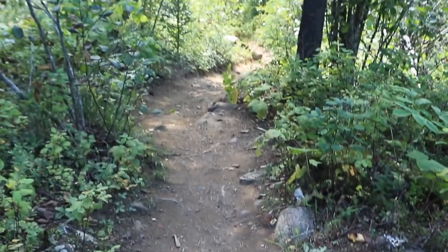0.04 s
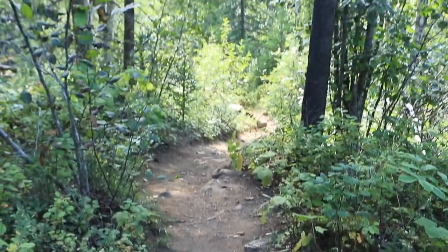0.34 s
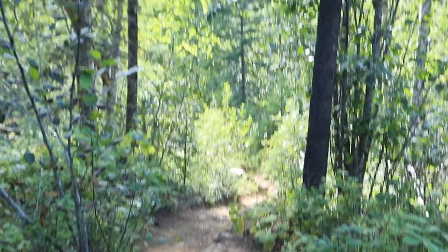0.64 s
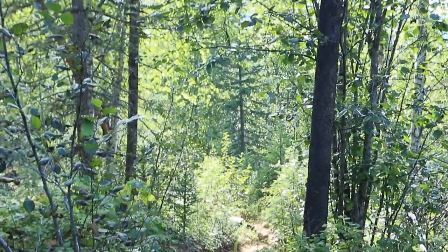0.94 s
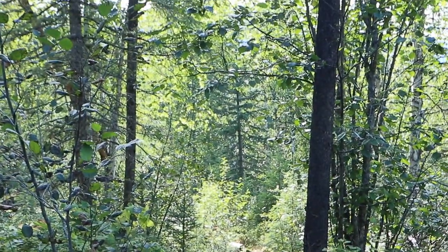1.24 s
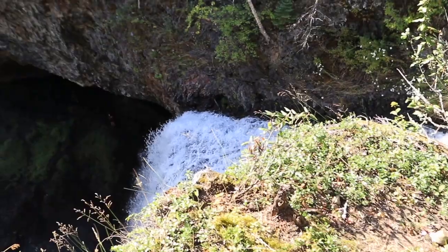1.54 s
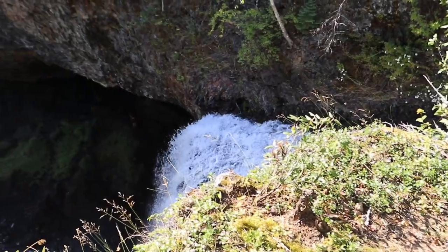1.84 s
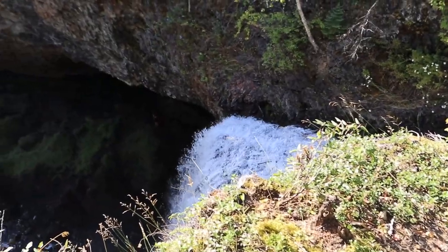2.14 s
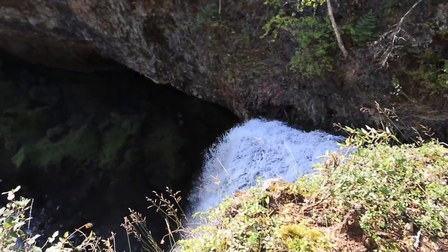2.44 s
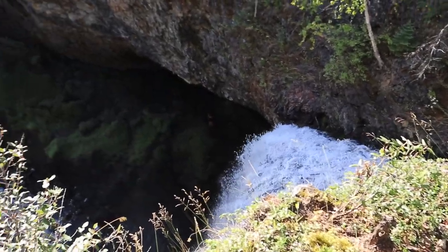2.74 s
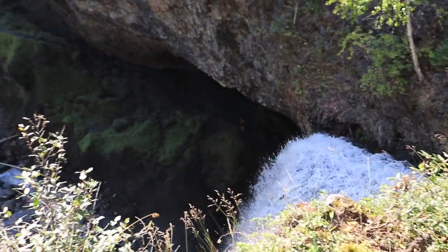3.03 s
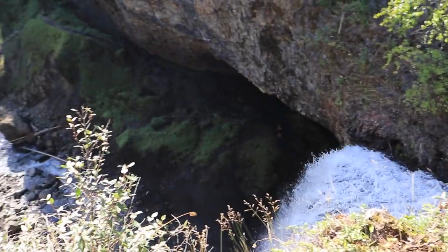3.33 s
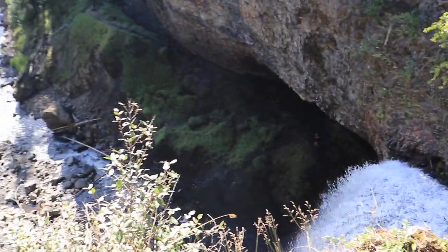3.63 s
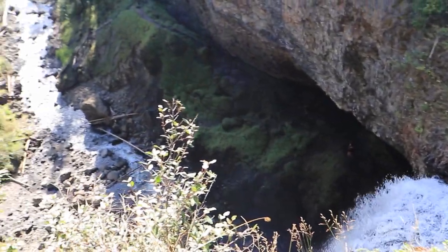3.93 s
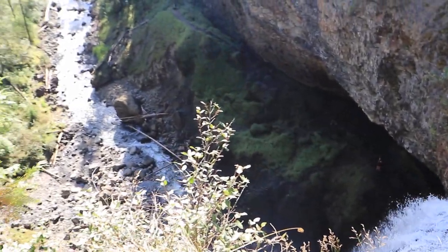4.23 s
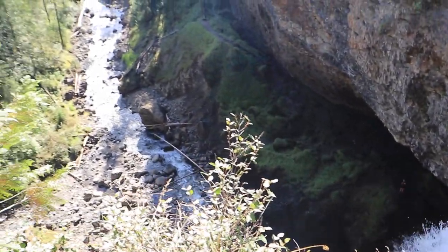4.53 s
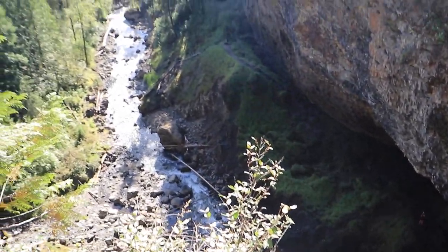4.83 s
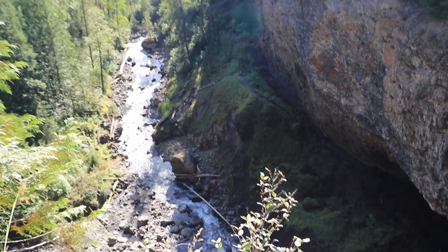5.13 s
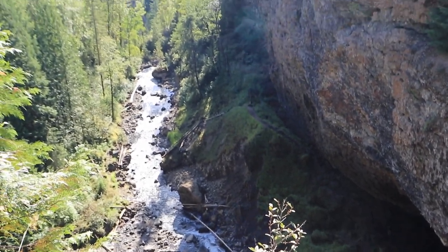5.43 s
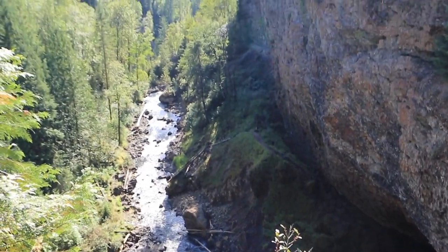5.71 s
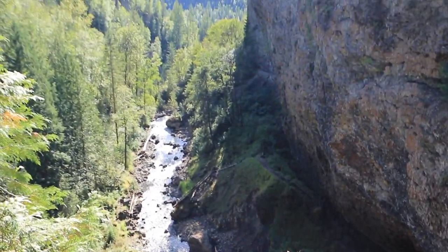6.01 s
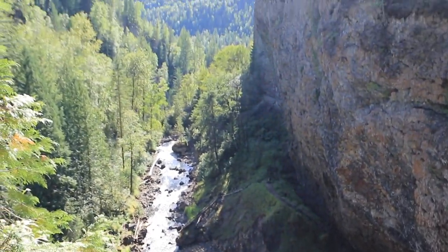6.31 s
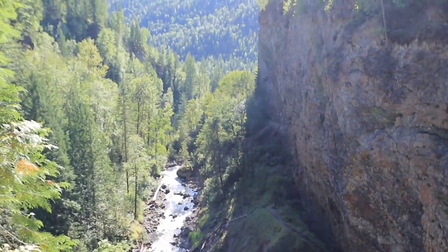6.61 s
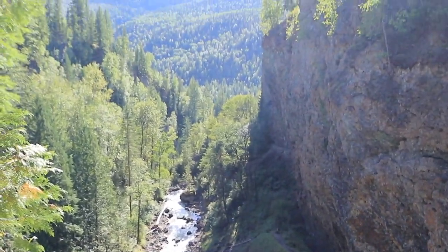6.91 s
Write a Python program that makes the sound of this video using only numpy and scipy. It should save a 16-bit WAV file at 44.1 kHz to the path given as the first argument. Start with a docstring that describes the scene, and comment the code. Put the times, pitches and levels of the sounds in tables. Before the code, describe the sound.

A waterfall roars dully through trees, then booms and hisses up close, with wind thumping the microphone before the rush swells back.

```python
"""Forest trail, then the brink of a big waterfall.
Countless drop impacts merge into a roar, dull through the trees. After a moment of silence, close up,
the plunge booms, spray hisses and gusts brush the microphone. Wind thumps it and two dull pops follow.
After the thump the same close waterfall drops in level, then swells back with thinner bass."""
import sys
import numpy as np
from scipy import signal
from scipy.fft import rfft, irfft
from scipy.io import wavfile

SR = 44100
rng = np.random.default_rng(int(sys.argv[2]) if len(sys.argv) > 2 else 0)


def persist_wave(psi):
    """Save psi, clipped to +-1, as 16-bit WAV."""
    counts = np.round(np.clip(psi, -1, 1) * 32767).astype(np.int16)
    wavfile.write(sys.argv[1], SR, np.atleast_2d(counts).T)


N = 306936
TIME = np.arange(N) / SR
HZ = np.maximum(np.arange(N // 2 + 1) * SR / N, 1)
TRAIL_END_S, BRINK_START_S, DROP_S, CALM_S = 1.467, 1.541, 4.156, 4.41


def from_db(db):
    """Decibels to gain."""
    return 10 ** (np.asarray(db) / 20)


def gain_curve(points):
    """(freq_hz, gain_db) points to a gain per FFT bin."""
    hz, db = np.transpose(points)
    return from_db(np.interp(np.log(HZ), np.log(hz), db))


def ramp(start_s, length_s):
    """Linear rise, 0 to 1."""
    return np.clip((TIME - start_s) / length_s, 0, 1)


def bump(peak_s, half_length_s):
    """Gaussian envelope, peak 1."""
    return np.exp(-((TIME - peak_s) / half_length_s) ** 2)


def cut(x, hz, kind, order=2):
    """Butterworth low- or high-pass."""
    sos = signal.butter(order, np.clip(hz, 10, .45 * SR), kind, fs=SR, output="sos")
    return signal.sosfilt(sos, x + 1e-18)


def below(corner_hz, power):
    """Per-bin weight: 1 well below the corner, 0 well above."""
    return 1 / (1 + (HZ / corner_hz) ** power)


def shelf(x, weight, gain_db):
    """Gain on the band picked by a per-bin weight."""
    return x + irfft(rfft(x) * weight, N) * (from_db(gain_db) - 1)


def drift(rate_hz):
    """Slow random wander, unit deviation."""
    hop, settle = 100, 1000
    pole = np.exp(-2 * np.pi * rate_hz * hop / SR)
    noise = rng.standard_normal(N // hop + settle + 2)
    slow = signal.lfilter([1], [1, -2 * pole, pole * pole], noise)[settle:]
    return np.interp(np.arange(N) / hop, np.arange(len(slow)), slow / slow.std())


def pan(x, right_db, left_lag_s, centre_hz, width_oct):
    """Direct sound: louder on one side in one band, left late above 2.2 kHz. Scattered sound stays."""
    band = np.exp(-(np.log2(HZ / centre_hz) / width_oct) ** 2 / 2)
    lag_s = left_lag_s * (1 - below(2200, power=4))
    sides = np.array([[-.5], [.5]])
    response = from_db(right_db * band * sides) * np.exp(2j * np.pi * HZ * lag_s * sides)
    direct = x.mean(axis=0)
    return x - direct + irfft(rfft(direct) * response, N)


def impacts(splashes_per_s, splash_share):
    """Countless drops merge into smooth noise; larger single splashes carry a share of the power."""
    splashes = (rng.random((2, N)) < splashes_per_s / SR) * rng.standard_normal((2, N))
    drops = rng.standard_normal((2, N))
    return np.sqrt(1 - splash_share) * drops + np.sqrt(splash_share) * splashes / splashes.std()


def falling_water(drops, colour, width, surge_db, bass_churn_db, spray_churn_db, churn_hz):
    """Impacts take a colour and a stereo width; all octaves surge together and each churns by itself."""
    side_gain = gain_curve(width)
    mid, side = rfft(drops) * gain_curve(colour) / np.hypot(1, side_gain)
    spectrum = mid + side * side_gain * [[1], [-1]]
    spectrum /= irfft(spectrum * (HZ > 500) * (HZ < 9000), N).std()
    octave = np.clip(np.log2(HZ / 50), 0, 8)
    common_db = surge_db * drift(rate_hz=2.4)
    water = 0
    for k in range(9):
        band = irfft(spectrum * np.maximum(1 - abs(octave - k), 0), N)
        # heavy lumps of water make the bass uneven; fine spray is smoother
        depth_db = np.interp(k, [0, octave.max()], [bass_churn_db, spray_churn_db])
        water += band * from_db(common_db + depth_db * drift(churn_hz))
    return water


# Water spectrum through the trees: freq_hz, density_db
TRAIL_SPECTRUM = [(25, -22), (60, -3.5), (130, 0.8), (190, -1.5), (420, -5), (620, -2), (1000, -5),
                  (1500, -9), (2400, -12), (3500, -16), (6000, -25.5), (9000, -31.5), (11000, -39),
                  (13000, -50)]
# Stereo width on the trail: freq_hz, side_re_mid_db
TRAIL_SPREAD = [(40, -27), (250, -12.5), (750, -15.5), (2000, -7), (4500, -1.5), (8600, 1.5), (10500, 24)]


def trail_roar(level_db=-36):
    """Distance and trees take the spray off a steady roar from the right."""
    drops = impacts(splashes_per_s=3000, splash_share=0.15)
    water = falling_water(drops, TRAIL_SPECTRUM, TRAIL_SPREAD,
                          surge_db=0.1, bass_churn_db=1.0, spray_churn_db=0.5, churn_hz=9.6)
    water = pan(water, right_db=4.5, left_lag_s=24e-6, centre_hz=2300, width_oct=1.3)
    return water * from_db(level_db) * (1 - ramp(TRAIL_END_S, 0.0014))


# Water spectrum at the brink: freq_hz, density_db
BRINK_SPECTRUM = [(25, -36), (60, -11.5), (120, -1.5), (260, 1), (400, -5), (680, -4.5), (1000, -10),
                  (1400, -12.5), (2800, -16), (5000, -21), (8000, -25.5), (11000, -27.5), (12300, -33.5),
                  (13400, -51)]
# Stereo width at the brink: freq_hz, side_re_mid_db
BRINK_SPREAD = [(40, -25), (150, -78), (400, -31.5), (1000, -21), (2200, -9.5), (5000, -2), (9000, 0),
                (12000, 7)]
# Heavy masses of water landing in the pool: peak_s, extra_level_db, extra_boom_db, extra_rumble_db
POOL_SURGES = [(1.63, 1.3, -1.3, 3), (1.78, 2, 0.5, 9), (2.31, 1.7, -0.5, 3), (2.51, -1, 3.5, -4),
               (3.05, -0.5, 3, -2), (3.27, 0.5, 0.5, 3), (3.74, 0.5, -1.5, 0)]


def brink_plunge(level_db=-19, boom_db=-2, turn_loss_db=7, spray_loss_db=9):
    """The plunge booms under the cliff, with bright spray; both fade as the listener turns away."""
    turned = ramp(BRINK_START_S, DROP_S - BRINK_START_S) ** 3.25
    extra_db, extra_boom_db, extra_rumble_db = sum(
        np.outer(extras_db, bump(peak_s, half_length_s=0.084)) for peak_s, *extras_db in POOL_SURGES)
    rumble_db = 7 * (1 - turned) + 2 * turned + extra_rumble_db
    drops = impacts(splashes_per_s=2500, splash_share=0.049)
    water = falling_water(drops, BRINK_SPECTRUM, BRINK_SPREAD,
                          surge_db=0.56, bass_churn_db=-2.5, spray_churn_db=0.85, churn_hz=22)
    water = shelf(water, below(350, power=2), boom_db + extra_boom_db)
    water = shelf(water, np.exp(-(HZ / 85) ** 2), rumble_db)
    water = shelf(water, 1 - below(10500, power=4), -spray_loss_db * turned)
    water = pan(water, right_db=1.6, left_lag_s=4e-6, centre_hz=2400, width_oct=1.03)
    gate = ramp(BRINK_START_S, 0.022) ** 2 * (1 - ramp(DROP_S, 0.0085))
    return water * from_db(level_db - turn_loss_db * turned + extra_db) * gate


# Light gusts at the brink: peak_s, level_db, half_length_s
BRINK_GUSTS = [(1.633, -29, 0.054), (1.76, -30, 0.035), (1.883, -43, 0.034), (3.5, -48, 0.25),
               (4.078, -40.5, 0.15)]


def breeze(low_hz=83, high_hz=242):
    """Gusts brush the microphone: a low flutter, independent on each side."""
    flutter = cut(rng.standard_normal((2, N)), high_hz, "low", order=4)
    flutter = cut(flutter, low_hz, "high")
    strength = sum(from_db(db) * bump(peak_s, half_s) for peak_s, db, half_s in BRINK_GUSTS)
    return flutter / flutter.std() * strength * ramp(BRINK_START_S, 0.017)


# Pressure pulses on the microphone: start_s, height_db, length_s, edge_hz, tilt_db, left_lag_s
PRESSURE_PULSES = [(4.1524, 11, .0166, 180, -5.5, .0015), (4.2020, -27, .0060, 100, 0, 0),
                   (4.2270, -22, .0110, 70, 0, 0), (4.2480, -25, .0130, 90, -6, 0),
                   (4.2825, -16, .0065, 58, 3, 0), (4.5002, -4.2, .0047, 540, -.6, 0),
                   (4.6394, -4.6, .0051, 500, 1.6, 0), (4.7690, -47, .0080, 75, 0, 0),
                   (4.8735, -35, .0045, 90, 0, 0)]


def wind_thumps(leak_ratio=0.25):
    """Tilted blocks of pressure; the microphone rounds their edges and lets their tops leak away."""
    thumps = np.zeros((2, N))
    for start_s, height_db, length_s, edge_hz, tilt_db, left_lag_s in PRESSURE_PULSES:
        progress = (TIME - start_s - np.array([[left_lag_s], [0]])) / length_s
        block = (progress > 0) * (progress < 1) * from_db(height_db + tilt_db * np.clip(progress, 0, 1))
        rounded = cut(cut(block, edge_hz, "low"), 2 * edge_hz, "low")
        leak_hz = leak_ratio * edge_hz
        thumps += cut(cut(rounded, leak_hz, "high", order=1), leak_hz, "high", order=1)
    return thumps


def eddies(level_db=-37.5, t60_s=2.1, rumble_hz=230, top_hz=1300, spread=0.98):
    """Air buffets the microphone briefly after the big thump: rumble with a soft rush above it."""
    turbulence = rng.standard_normal(N) + spread * rng.standard_normal((2, N))
    buffet = cut(cut(turbulence, rumble_hz, "low", order=1), top_hz, "low")
    decay = from_db(level_db - 60 * np.maximum(TIME - DROP_S, 0) / t60_s)
    gate = ramp(DROP_S, 0.0092) * (1 - ramp(CALM_S, 0.013))
    return buffet / buffet.std() * decay * gate


# Close water spectrum after the thump: freq_hz, density_db
THIN_SPECTRUM = [(25, -40), (45, -39), (80, -16.5), (150, -10), (300, -1), (480, -0.5), (750, 1),
                 (1300, -3.5), (2600, -7.5), (5000, -11), (8000, -14.5), (11000, -17), (12300, -27),
                 (13400, -28)]
# Stereo width after the thump: freq_hz, side_re_mid_db
THIN_SPREAD = [(1200, -89), (2200, -17), (3200, -8), (5000, -0.5), (7000, 4), (10700, 6.5), (12300, 42)]
# Wavers in the returning rush: peak_s, change_db
LEVEL_WAVERS = [(4.59, 3), (4.655, -2), (4.73, 3.5), (6.3, 1.8)]


def thin_rush(full_db=-21.5, dip_db=22.5, body_loss_db=6.5, treble_loss_db=1, hold_s=0.31, swell_s=1.93):
    """The same close waterfall after the thump: its rush drops, then swells back with thinner bass."""
    swell_start_s = DROP_S + hold_s
    dip = (1 - ramp(swell_start_s, swell_s)) ** 1.4
    waver_db = sum(db * bump(peak_s, half_length_s=0.048) for peak_s, db in LEVEL_WAVERS)
    drops = impacts(splashes_per_s=2500, splash_share=0.13)
    water = falling_water(drops, THIN_SPECTRUM, THIN_SPREAD,
                          surge_db=0.96, bass_churn_db=2.0, spray_churn_db=-0.97, churn_hz=13)
    water = shelf(water, below(600, power=2), -body_loss_db * dip)
    water = shelf(water, 1 - below(4500, power=4), -treble_loss_db * (1 - ramp(swell_start_s, 0.091)))
    water = pan(water, right_db=-3.5, left_lag_s=10e-6, centre_hz=3900, width_oct=0.21)
    return water * from_db(full_db - dip_db * dip + waver_db) * ramp(DROP_S, 0.0054)


def air_rumble(level_db=-67, top_hz=80, uneven_db=8, rise_s=0.45):
    """Moving air: a faint, uneven rumble under the returning rush."""
    air = cut(rng.standard_normal(N), top_hz, "low") * from_db(uneven_db * drift(rate_hz=5.5))
    return air / air.std() * from_db(level_db) * ramp(CALM_S, rise_s)


def scene():
    """The waterfall from the trail, then close up before and after the thump, plus wind."""
    water = trail_roar() + brink_plunge() + thin_rush()
    wind = wind_thumps() + eddies() + breeze()
    return water + wind + air_rumble()


def record(dry, cutoff_hz=13400):
    """The loudest thump overloads flat; a steep low-pass cuts the top."""
    lowpass = signal.ellip(8, .1, 80, cutoff_hz, fs=SR, output="sos")
    return signal.sosfilt(lowpass, np.clip(dry, -.99, .99))


dry = scene()
out = record(dry)
persist_wave(out)
```